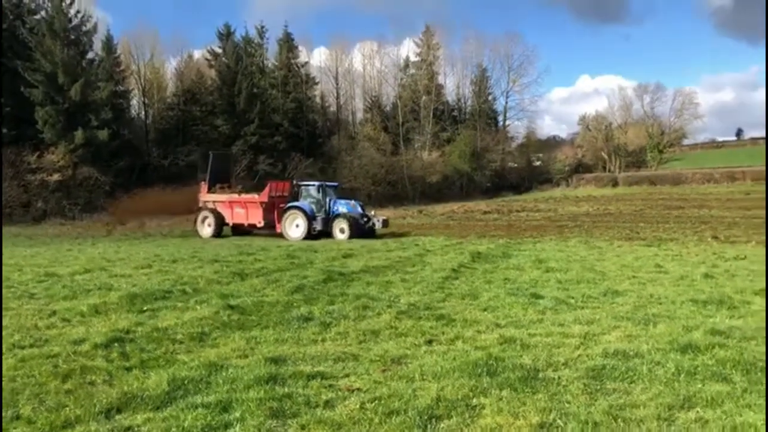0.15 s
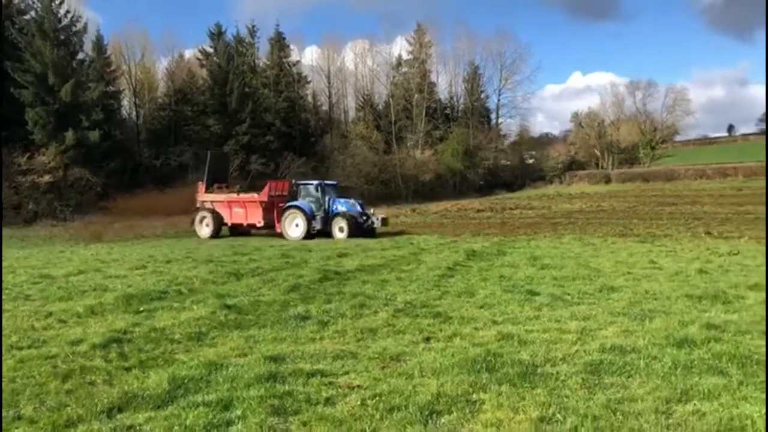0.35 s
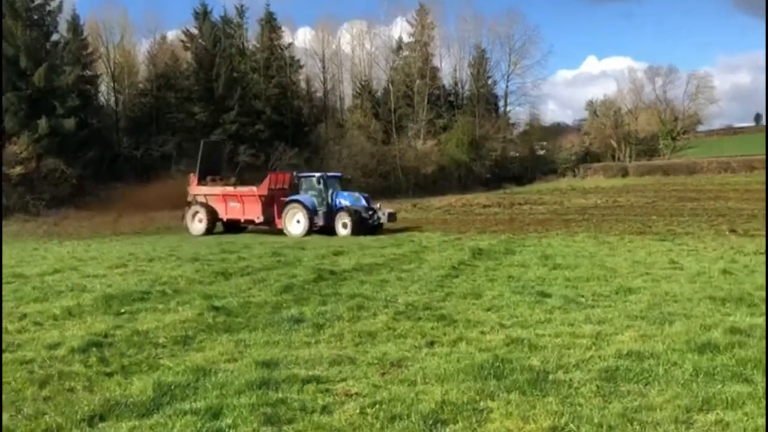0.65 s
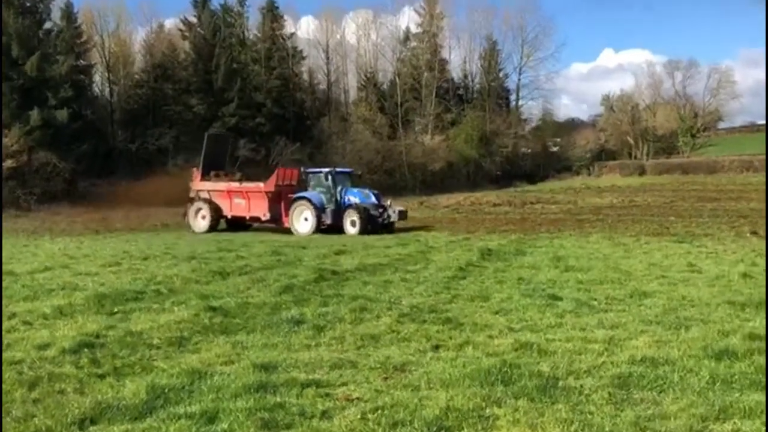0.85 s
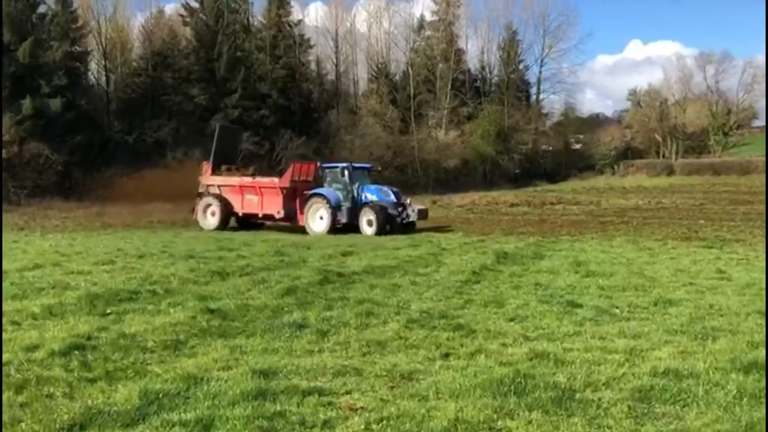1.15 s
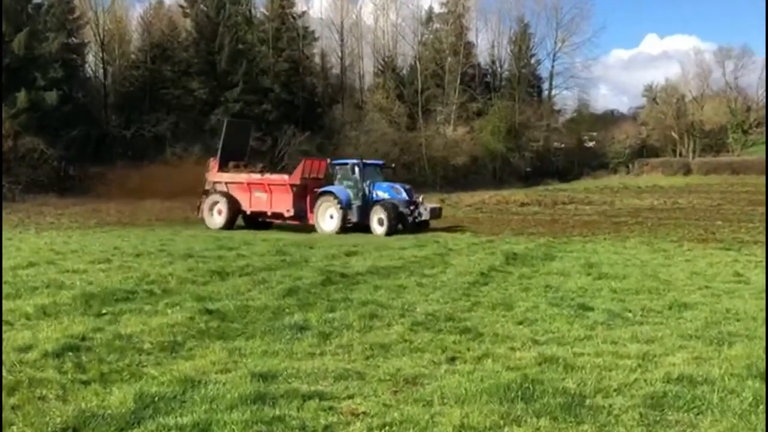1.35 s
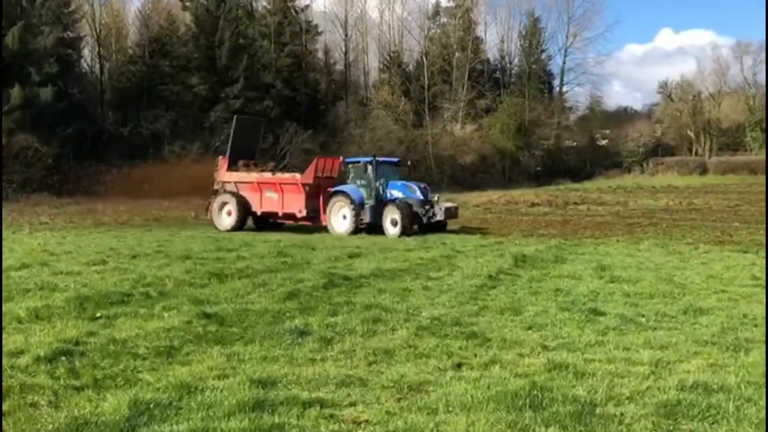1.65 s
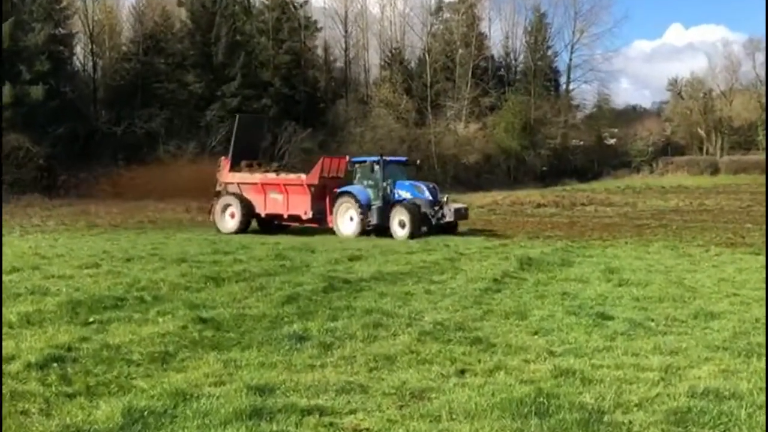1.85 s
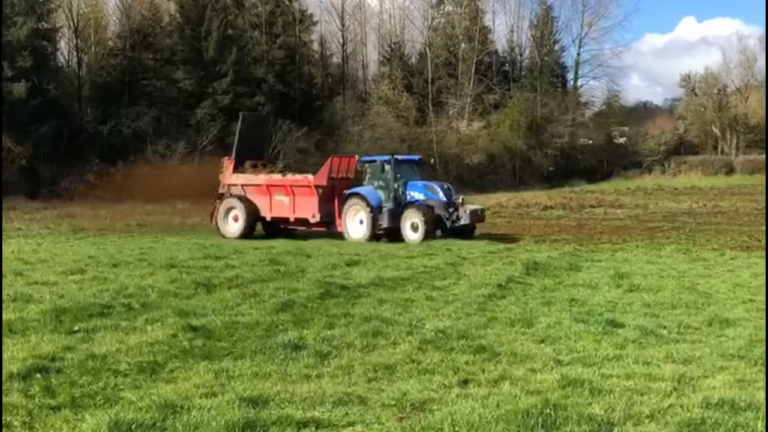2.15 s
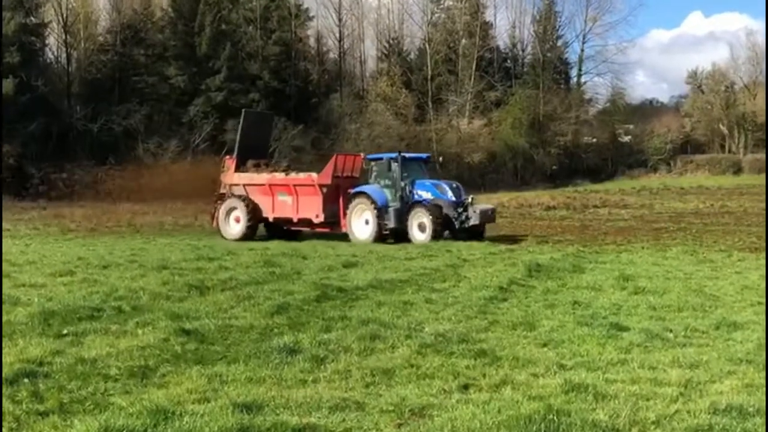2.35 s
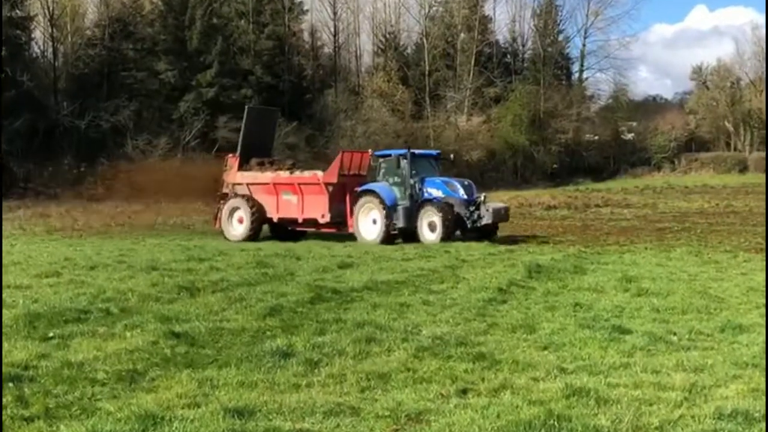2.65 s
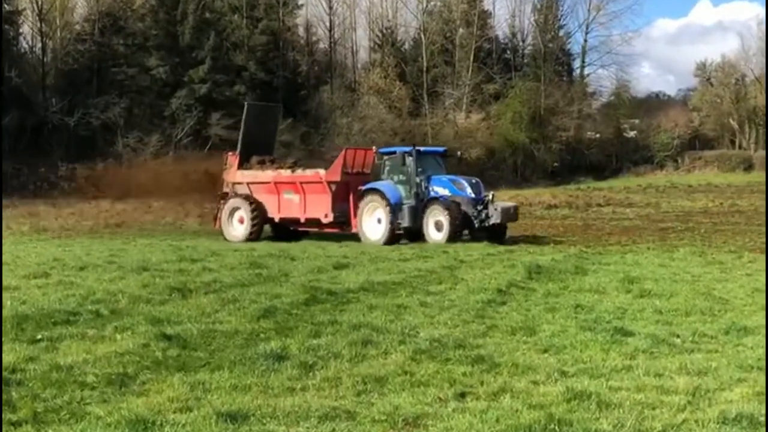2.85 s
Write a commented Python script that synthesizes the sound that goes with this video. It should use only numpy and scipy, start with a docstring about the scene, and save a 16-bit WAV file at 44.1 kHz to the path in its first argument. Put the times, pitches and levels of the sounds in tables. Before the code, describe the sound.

A diesel tractor drones and rattles steadily at working speed some way off in an open field, its spreader hissing and clattering early on, while wind rumbles and pops on the microphone, strongest mid-way.

```python
"""In a field, some way off, a six-cylinder diesel tractor pulls a muck spreader at nearly steady speed.
Its exhaust drones and its whines swell as sines locked to the crank; its block rattles as noise bursts
ring at each firing, over a pulsing noise roar. The spreader's beaters hiss as coloured noise and clatter
as short swept knocks, and a thin sine rises. Wind buffets the microphone, hardest in the middle,
as low noise swelling in power, with sharp pops of pressure."""
import sys
import numpy as np
from scipy import signal
from scipy.fft import rfft, irfft, next_fast_len
from scipy.io import wavfile
from scipy.ndimage import uniform_filter1d, map_coordinates

SR = 44100
rng = np.random.default_rng(int(sys.argv[2]) if len(sys.argv) > 2 else 0)


def log_audio(samples):
    """Write samples as a 16-bit WAV file to the path given in sys.argv[1]."""
    # one column per channel
    frames = np.atleast_2d(samples).T
    # limit to full scale, then quantise
    limited = np.clip(frames, -1, 1)
    pcm = np.round(limited * 32767).astype(np.int16)
    wavfile.write(sys.argv[1], SR, pcm)


N = 132300

# Loudness of the machine before the layer trims: start_s, engine_db, hiss_db
MACHINE_LEVEL = [(0, -41, -50.5), (.25, -43, -52), (.42, -42, -49.5), (.51, -40.5, -44.5),
                 (.62, -41.5, -51.5), (.9, -40.5, -48.5), (1.13, -40.5, -46.5), (1.26, -37.5, -46.5),
                 (1.4, -38.5, -48), (1.7, -39, -51), (1.95, -38, -46.5), (2.15, -39, -49.5),
                 (2.6, -40, -50), (3, -39, -49.5)]
FLUTTER_DB = 1.2  # random level flutter of every pitched tone


def amp(db):
    """Decibels to gain."""
    return 10 ** (np.asarray(db) / 20)


def unit(x):
    """Scale to rms 1."""
    return x / np.sqrt(np.mean(x ** 2) + 1e-20)


def clock():
    """Time of each sample in seconds."""
    return np.arange(N) / SR


def curves(rows):
    """One value per sample for each column after the time."""
    start_s, *columns = np.transpose(rows)
    return [np.interp(clock(), start_s, column) for column in columns]


def wobble(rate):
    """A smooth random curve, rate knots a second."""
    return map_coordinates(rng.standard_normal(1024), [clock() * rate + 2], mode="wrap")


def filtered(x, response):
    """Multiply the spectrum of x by a response of frequency."""
    size = next_fast_len(N + 8192)
    hz = np.fft.rfftfreq(size, 1 / SR)
    return irfft(rfft(x, size) * response(hz), size)[:N]


def colour_gain(hz, points):
    """Gain at each frequency, drawn in dB over log frequency."""
    point_hz, point_db = np.transpose(points)
    return amp(np.interp(np.log(hz), np.log(point_hz), point_db))


def coloured(x, points):
    """Give x a spectral colour, at rms 1."""
    return unit(filtered(x, lambda hz: colour_gain(hz + 1, points)))


def noise(points):
    """Noise of a given colour."""
    return coloured(rng.standard_normal(N), points)


def steadied(x, span_s):
    """Even out the chance swells of a noise."""
    span = max(int(span_s * SR), 8)
    local_level = np.sqrt(np.abs(uniform_filter1d(x * x, span)))
    return unit(x / (local_level + 0.074))


def stranded(x, size=2048):
    """Narrow bands of a far sound swell and fade on their own as the air moves."""
    depth_db, band_hz, life_s = 2, 55.1, 0.297
    bands = signal.stft(x, nperseg=size)[2]
    rows = np.arange(bands.shape[0]) * SR / size / band_hz
    columns = np.arange(bands.shape[1]) * size / 2 / SR / life_s
    grid = np.meshgrid(rows, columns, indexing="ij")
    field = map_coordinates(rng.standard_normal((512, 64)), grid, mode="wrap")
    return unit(signal.istft(bands * amp(depth_db * field), nperseg=size)[1][:N])


def wind():
    """Turbulence on the microphone: each buffet starts with a flutter and sinks into rumble."""
    # Wind strength before the rumble trim: start_s, level_db
    strength = [(0, -44), (.12, -37.5), (.3, -29.5), (.4, -32), (.5, -40), (.65, -37.5), (.8, -37.5),
                (.95, -34), (1.1, -35.5), (1.3, -27.5), (1.37, -31.5), (1.55, -27.5), (1.8, -26),
                (2.0, -31.5), (2.1, -35.5), (2.5, -35.5), (2.7, -33), (2.85, -44), (3, -35)]
    # Buffets before the rumble trim: centre_s, rumble_db, flutter_db, half_length_s
    buffets = [(0.158, -34, -46, 0.0082), (0.221, -35, -33.5, 0.0062), (0.261, -28, -30, 0.0053),
               (0.284, -30, -35.5, 0.0048), (0.318, -24.5, -30, 0.0077), (0.343, -31, -30, 0.006),
               (0.475, -25, -37, 0.0058), (.527, -30, -37, 0.017), (0.578, -43, -36.5, 0.008),
               (0.597, -31, -45, 0.0054), (0.648, -35, -38.5, .008), (0.697, -28, -38, .005),
               (0.742, -28.5, -41, 0.011), (0.771, -28, -39, 0.0045), (0.82, -29.5, -43, .005),
               (1.114, -36, -33, .005), (1.145, -30, -28.5, 0.0091), (1.195, -36, -30, 0.0024),
               (1.238, -22, -24.5, 0.0074), (1.26, -33, -28, 0.0031), (1.266, -17.5, -37, 0.0088),
               (1.396, -27, -23, .006), (1.405, -22, -39, .005), (1.466, -14.5, -26.5, 0.0076),
               (1.481, -19, -38, 0.0051), (1.585, -24, -28, 0.0079), (1.603, -26.5, -30.5, 0.012),
               (1.672, -21, -31.5, .008), (1.711, -21, -18, 0.0043), (1.741, -27, -21.5, 0.0037),
               (1.766, -12.5, -19.5, 0.0072), (1.815, -28, -19.5, 0.0046), (1.848, -26, -32, 0.0035),
               (1.87, -23, -37, .005), (1.887, -21.5, -46, 0.0046), (1.93, -21, -34.5, 0.0064),
               (1.95, -22, -46, 0.0095), (2.026, -24.5, -31.5, .011), (2.218, -42, -37, 0.0093),
               (2.353, -33, -39, .006), (2.43, -33.5, -43, .008), (2.644, -31, -38, 0.0092),
               (2.709, -39, -34, .008)]
    # Low rumble colour: freq_hz, density_db
    rumble_colour = [(20, -49), (35, -4), (50, -0.5), (80, 1), (150, 2.5), (220, -2.5), (300, -16),
                     (450, -32), (800, -41), (2000, -77)]
    # Colour of the flutter that strong gusts add: freq_hz, density_db
    flutter_colour = [(60, -16), (160, -0.5), (260, 2.5), (380, -3), (520, -11.5), (700, -19.5),
                      (1100, -36), (3000, -80)]
    rumble_trim_db, steady_flutter_db, rumble_lag_s = -2.4, -16.5, 0.0035

    t = clock()
    # Buffets add to the steady wind as power
    rumble_power = amp(curves(strength)[0] + 1.9 * wobble(35.12)) ** 2
    flutter_power = rumble_power * amp(steady_flutter_db + 2.4 * wobble(40)) ** 2
    for centre_s, rumble_db, flutter_db, half_s in buffets:
        late = (t - centre_s - rumble_lag_s) / half_s
        rumble_power = rumble_power + amp(rumble_db) ** 2 * np.exp(-.5 * late ** 2)
        prompt = (t - centre_s) / half_s
        flutter_power = flutter_power + amp(flutter_db) ** 2 * np.exp(-.5 * prompt ** 2)
    rumble = amp(rumble_trim_db) * np.sqrt(rumble_power) * steadied(noise(rumble_colour), span_s=0.0228)
    flutter = np.sqrt(flutter_power) * steadied(noise(flutter_colour), span_s=0.0193)
    return rumble + flutter


def pressure_swing(u):
    """A dip then a rise through zero, each peaking at 1."""
    return u * np.exp(.5 * (1 - u * u))


def pops():
    """Each eddy thumps the port with one pressure swing; a quicker copy steepens its front."""
    # Single eddies: centre_s, swing_peak_db, pitch_hz, front_db (relative to the swing)
    eddies = [(.227, -26, 235, -22), (.261, -26, 270, -26), (0.29, -22, 200, -14), (.32, -19, 120, -15),
              (.34, -23, 245, -20), (.472, -25, 165, -20), (0.535, -27, 105, -24), (0.586, -30, 190, -8),
              (0.663, -24.5, 148, -22), (1.145, -24, 287, -26), (1.201, -22, 198, -28),
              (1.243, -21, 175, -20), (1.257, -18.5, 330, -15), (1.275, -18.5, 164, -24),
              (1.399, -16, 220, -33), (1.414, -14.5, 96, -25), (1.471, -11, 172, -32),
              (1.605, -24, 260, -13), (1.619, -17.5, 274, -24), (1.68, -24, 110, -24),
              (1.714, -8.5, 196, -19), (1.741, -16.5, 220, -17), (1.776, -12, 228, -25),
              (1.820, -7.5, 220, -25), (1.871, -18.5, 233, -26), (1.892, -20, 105, -26),
              (1.932, -14, 122, -28), (2.024, -22, 150, -27)]
    front_speed = 3.6  # front's quickness relative to the swing
    out = np.zeros(N)
    for centre_s, peak_db, pitch_hz, front_db in eddies:
        u = 2 * np.pi * pitch_hz * (clock() - centre_s)
        front = amp(front_db) * pressure_swing(front_speed * u)
        out += amp(peak_db) * (pressure_swing(u) + front)
    return out


def drive():
    """A thin rising whine, perhaps the spreader's drive, fluttering in the moving air."""
    # Pitch and level before flutter: start_s, pitch_hz, level_db
    glide = [(0, 1436, -74), (.9, 1441, -49.5), (1.5, 1445, -62), (1.9, 1468, -52), (2.3, 1490, -59),
             (2.6, 1496, -58), (3, 1488, -63)]
    pitch_hz, level_db = curves(glide)
    phase = 2 * np.pi * np.cumsum(pitch_hz) / SR + .5 * wobble(9.4)
    return np.sqrt(2) * amp(level_db + FLUTTER_DB * wobble(6.65)) * np.sin(phase)


def clatter():
    """Short dry knocks, likely the spreader's beaters, whose treble arrives just ahead of the bass."""
    # Quick uneven knocks: centre_s, peak_db
    knocks = [(.189, -35), (.214, -31), (.226, -32), (0.234, -40), (.251, -29.5), (0.273, -28.5),
              (.303, -30), (.317, -34), (.331, -30.5), (.339, -34), (.352, -31), (.366, -30), (.393, -27.5),
              (.421, -26.5), (.455, -30), (.467, -27), (0.48, -28), (.495, -31), (.51, -34.5),
              (.523, -27.5), (.545, -25.5), (.606, -28.5), (.663, -29.5), (.696, -29), (.713, -29),
              (0.737, -29), (.757, -32), (.813, -29), (.918, -30), (1.256, -27.5)]
    # Knock colour: freq_hz, density_db
    knock_colour = [(300, -14), (600, 3.5), (1000, -2.5), (1400, 2), (1900, -9.5), (3000, -11), (6000, -47)]
    centre_hz, spread_s = 1300, 0.00199
    size = 2048
    hz = np.fft.rfftfreq(size, 1 / SR) + 1
    gain = colour_gain(hz, knock_colour)
    # This phase delays each frequency by spread_s * log(centre_hz / hz)
    sweep = 2 * np.pi * spread_s * hz * (np.log(hz / centre_hz) - 1)
    out = np.zeros(N + size)
    for centre_s, peak_db in knocks:
        phase = sweep + 2 * np.pi * rng.random()
        knock = np.fft.fftshift(irfft(gain * np.exp(1j * phase)))
        start = round(centre_s * SR) - size // 2
        out[start:][:size] += amp(peak_db) * knock / np.abs(knock).max()
    return out[:N]


def engine_cycles():
    """Four-stroke cycles completed: one for two turns of the crank."""
    # Engine speed: start_s, speed_rpm
    speed = [(0, 1986), (0.75, 1978), (1.05, 1977), (1.43, 1967), (1.72, 1974), (1.95, 1957), (2.16, 1967),
             (2.45, 1948), (2.7, 1951), (3, 1948)]
    return np.cumsum(curves(speed)[0]) / (120 * SR)


def hiss(cycles, firing_db):
    """Treble of the beaters and the engine's air, throbbing slightly with the firings."""
    # Hiss colour: freq_hz, density_db
    hiss_colour = [(500, -11), (2500, -3.5), (4000, -1), (5200, -0.5), (6100, 3.5), (6600, -1), (7700, -1),
                   (8600, -8), (9800, -7), (10200, -6), (10800, -14.5), (11700, -25)]
    trim_db = 1.47
    throb_db = firing_db * np.cos(2 * np.pi * cycles * 6) + 0.66 * wobble(60)
    level_db = curves(MACHINE_LEVEL)[1] + throb_db + trim_db
    return amp(level_db) * coloured(stranded(rng.standard_normal(N)), hiss_colour)


def crank_tone(cycles, order):
    """A sine at a multiple of the engine cycle, fluttering in the moving air."""
    phase = 2 * np.pi * (order * cycles + rng.random()) + .5 * wobble(11)
    return np.sqrt(2) * amp(FLUTTER_DB * wobble(6.94)) * np.sin(phase)


def exhaust_drone(cycles):
    """Low exhaust tones locked to the crank."""
    # Drone tones before the trim: cycle_multiple, level_db
    drone_tones = [(6, -53), (9, -46.5), (10, -55), (12, -48), (13, -57), (15, -57)]
    trim_db = -0.7
    return amp(trim_db) * sum(amp(db) * crank_tone(cycles, order) for order, db in drone_tones)


def engine_whines(cycles):
    """Higher crank-locked tones that each swell and fade as the tractor passes."""
    # Whines before trim and swell: cycle_multiple, level_db, loudest_s
    whine_tones = [(44, -52.5, 1.5), (48, -56.5, 2.1), (54, -52.5, 1.9), (60, -56, 2.3), (61, -55, 2.6),
                   (63, -55, 1.0), (68, -52.5, 1.5), (70, -55, 1.3), (74, -50.5, 1.4), (75, -52, 1.3),
                   (78, -53, 1.7), (81, -54.5, 1.3), (84, -56, 2.1), (92, -54.5, 2.4), (98, -55.5, 2.1),
                   (99, -55, 2.4), (108, -55, 1.6), (109, -56, 1.9), (115, -54.5, 1.3), (116, -53.5, 1.4),
                   (142, -58.5, 1.7), (144, -60, 2.1), (164, -58.5, 1.3), (172, -60, 1.5), (178, -59, 1.4),
                   (187, -58, 1.0)]
    trim_db, swell_s, swell_db = 3, 0.34, 10.5
    out = np.zeros(N)
    for order, db, loudest_s in whine_tones:
        bump = np.exp(-.5 * ((clock() - loudest_s) / swell_s) ** 2)
        out += amp(db + swell_db * (bump - 1)) * crank_tone(cycles, order)
    return amp(trim_db) * out


def radiated(x):
    """The engine's colour shifts as the tractor turns its side to the listener."""
    # Block colour before the turn: freq_hz, density_db
    early_colour = [(100, -5), (250, -3.5), (400, -9.5), (560, 0), (700, -0.5), (830, -6), (1000, -2.5),
                    (1250, 0), (1520, -4), (1850, -2.5), (2150, -6), (2750, -7.5), (3150, -7),
                    (3650, -12.5), (4050, -19), (6000, -28.5), (11000, -44)]
    # Block colour when nearly side-on: freq_hz, density_db
    side_colour = [(100, -9), (250, 0), (430, -10.5), (560, 1.5), (700, -3.5), (830, 0), (1000, -1),
                   (1250, 1), (1550, -3), (1850, -4), (2200, -8.5), (3100, -8.5), (3650, -12.5),
                   (4050, -19), (6000, -38), (11000, -35)]
    turn_s, turn_length_s = 2.37, 0.26
    side = .5 + .5 * np.tanh((clock() - turn_s) / turn_length_s)
    return unit((1 - side) * coloured(x, early_colour) + side * coloured(x, side_colour))


def rattle(cycles, drift_rate, count=6):
    """Each cylinder rings the block in its own way at every firing; the ring drifts with the sound's path."""
    ring_s = 0.024  # decay time
    t = np.arange(SR // 8) / SR
    out = np.zeros(N)
    for cylinder in range(count):
        fires = np.diff(np.floor(cycles - cylinder / count), prepend=0) > 0
        # Two random rings trade places at drift_rate radians a second
        turn = drift_rate * clock() + rng.uniform(0, 2 * np.pi)
        for weight in (np.cos(turn), np.sin(turn)):
            ring = rng.standard_normal(len(t)) * np.exp(-t / ring_s)
            strikes = fires * weight * amp(0.6 * rng.standard_normal(N))
            out += signal.fftconvolve(strikes, ring)[:N]
    return radiated(out)


def roar(cycles):
    """Uneven engine noise that pulses with the six firings of a cycle."""
    pulsing = 0.041  # depth as a fraction
    firing = 1 + pulsing * np.cos(2 * np.pi * cycles * 6)
    return radiated(stranded(rng.standard_normal(N)) * firing * amp(1.2 * wobble(70)))


def engine(cycles):
    """Block rattle and roar under one loudness curve."""
    roar_db, rattle_db = -.8, -1.5
    mix = amp(roar_db) * roar(cycles) + amp(rattle_db) * rattle(cycles, drift_rate=2.33)
    return amp(curves(MACHINE_LEVEL)[0]) * mix


def scene():
    """The wind at the microphone and the distant machine."""
    cycles = engine_cycles()
    spreader = drive() + clatter() + hiss(cycles, firing_db=1.07)
    tractor = exhaust_drone(cycles) + engine_whines(cycles) + engine(cycles)
    return (wind() + pops() + spreader + tractor)[None]


def record(dry):
    """The recorder drops the deepest bass and keeps nothing above its band limit."""
    low_cut_hz, top_hz = 48, 11750

    def response(hz):
        """Steep low cut and a sharp top edge."""
        return (hz < top_hz) * hz ** 4 / np.sqrt(hz ** 8 + low_cut_hz ** 8)
    return filtered(dry[0], response)[None]


dry = scene()
out = record(dry)
log_audio(out)
```